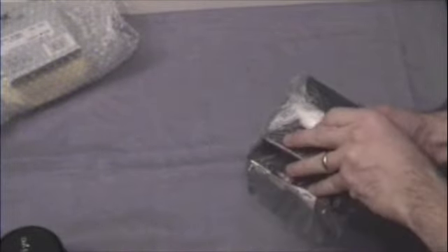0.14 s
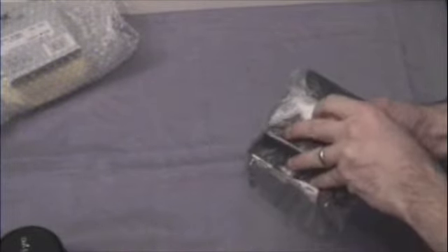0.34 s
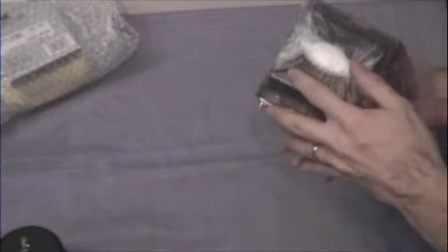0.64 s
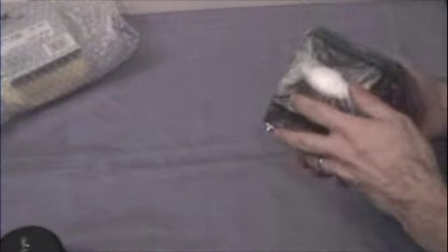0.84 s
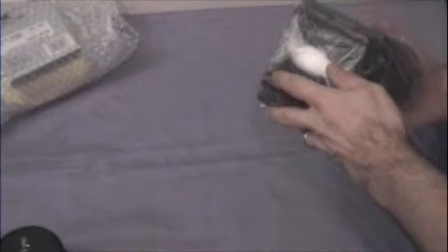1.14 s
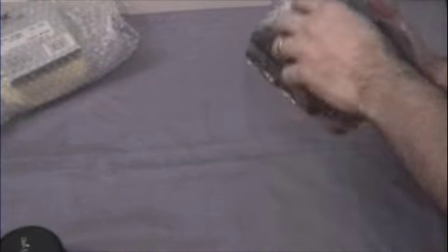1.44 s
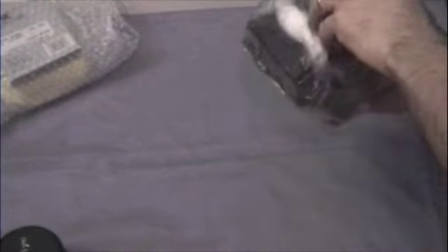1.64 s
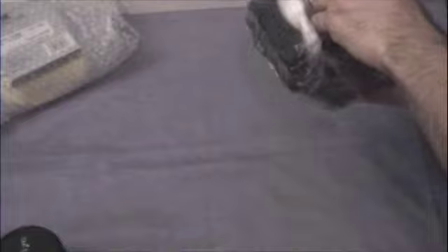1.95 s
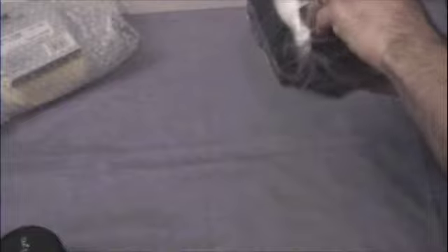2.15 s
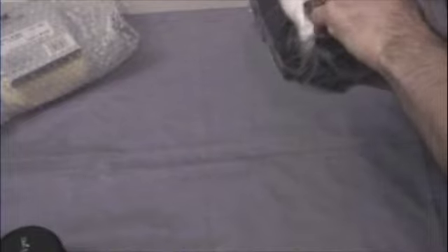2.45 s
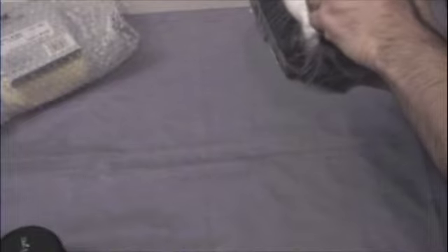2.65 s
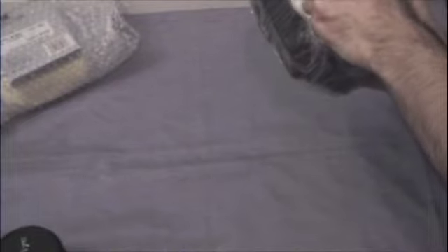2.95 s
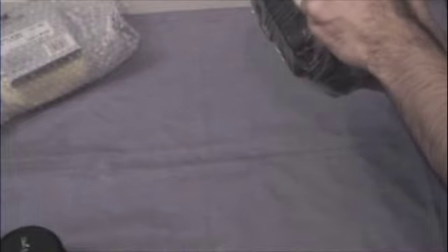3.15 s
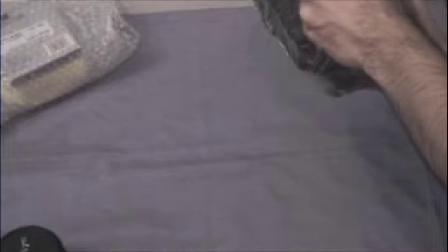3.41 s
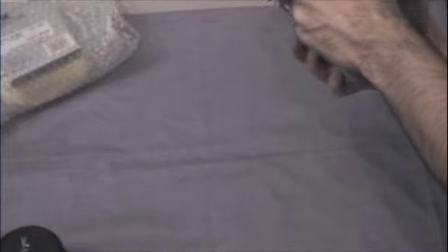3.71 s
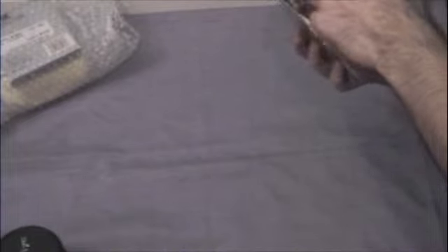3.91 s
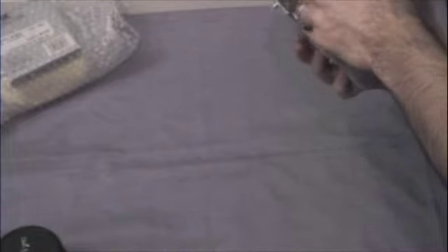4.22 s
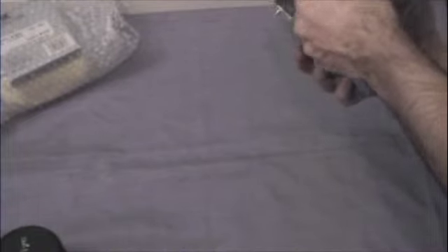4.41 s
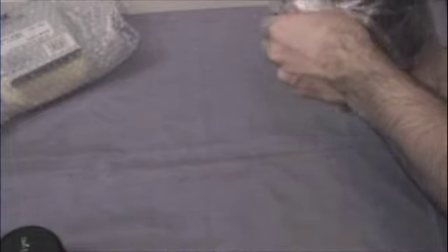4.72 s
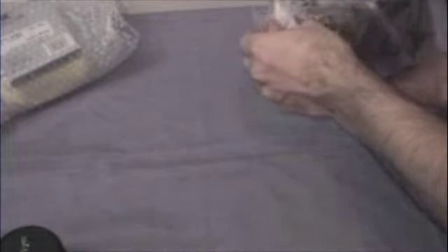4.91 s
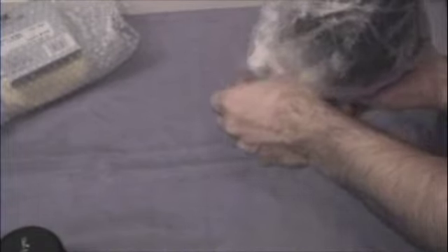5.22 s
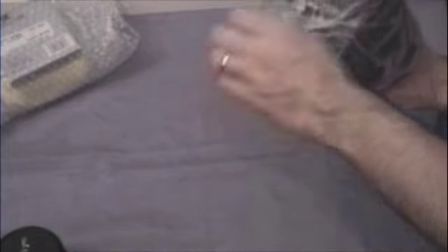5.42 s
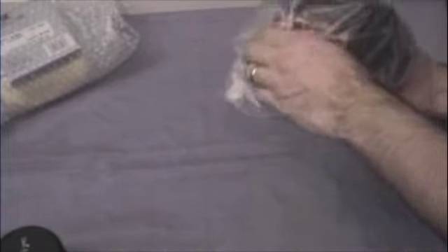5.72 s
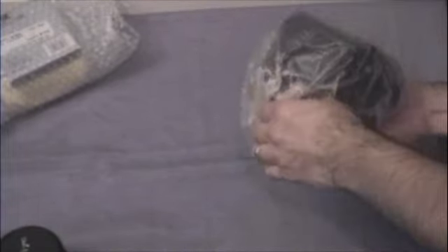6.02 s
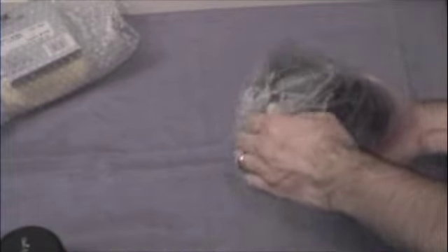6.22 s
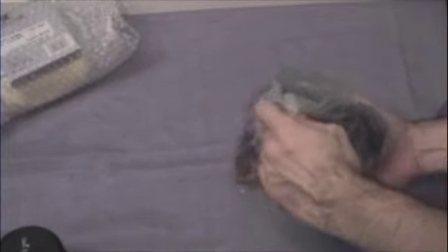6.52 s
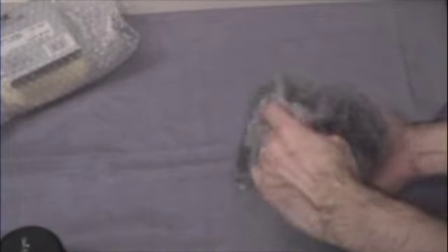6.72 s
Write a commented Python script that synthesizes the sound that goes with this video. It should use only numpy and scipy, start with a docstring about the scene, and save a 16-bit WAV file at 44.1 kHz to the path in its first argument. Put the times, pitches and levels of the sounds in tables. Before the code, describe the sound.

Thin, crisp plastic film is worked by hand around a small hollow box, close to a camera microphone in a small room with very short tails. From 0 to 1.5 seconds, uneven crackles and clicks come in quick clumps, with a sharper snap near 0.8 and hollow box knocks, notably around 1.3. From about 1.6 to 3.3 the handling is light: sparse, quiet ticks and small taps, with one brighter click at 2.8. At 3.4 a very sharp, loud snap bursts out, the strongest single sound. Scattered snaps and short bursts follow, building from 4.5 into dense, loud crumpling until 5.3. It nearly stops from 5.4 to 5.7, then swells again into thick, forceful crackle from 6 to the end. Underneath run steady soft hiss, low fan hum, a faint wavering motor tone and an extremely faint high whistle.

```python
"""Thin plastic film crackles at once, in dense clumps, as hands turn and pull open a bag wrapped round a small box.
Each small fold is a click that rings a patch of film; large folds snap loudly and knock the hollow box.
Pressing fingers make the box louder for a moment, and a small room adds short tails.
Behind it a fan hums (noise through narrow resonances) and a low motor tone wavers.
The tape camera adds hiss (shaped noise) and a faint line whistle (steady sines)."""
import sys
import numpy as np
from scipy import signal
from scipy.fft import rfft, irfft
from scipy.io import wavfile

SR = 44100
rng = np.random.default_rng(int(sys.argv[2]) if len(sys.argv) > 2 else 0)


def wav_record(signal):
    """Record a signal, one row per channel, as 16-bit PCM in the file named by sys.argv[1]."""
    frames = np.transpose(np.atleast_2d(signal))
    bounded = np.clip(frames, -1, 1)
    # unit amplitude maps onto the largest positive 16-bit level
    quanta = np.round(bounded * 32767).astype(np.int16)
    wavfile.write(sys.argv[1], SR, quanta)


def natural_amplitude(level_db):
    """Convert a level in decibels to a linear amplitude factor, elementwise."""
    exponent = np.asarray(level_db, float) / 20
    return 10 ** exponent


N = 302526   # length in samples

# How hard the film is worked: time_s, relative_crackle_db
FILM_EFFORT = [(0.0, -36), (0.19, -44), (0.27, -41), (0.42, -56), (0.53, -43), (0.56, -35), (0.69, -38.5),
               (0.76, -41), (0.9, -38), (1.01, -38.5), (1.2, -35.5), (1.49, -45.5), (1.62, -53.5),
               (1.76, -47.5), (1.83, -61), (1.88, -42.5), (2.01, -59.5), (2.39, -54.5), (2.5, -60.5),
               (2.8, -46.5), (3.0, -50), (3.08, -59), (3.17, -52), (3.36, -54.5), (3.5, -48), (3.76, -36.5),
               (3.92, -57.5), (4.12, -64), (4.17, -35.5), (4.55, -36), (4.59, -30.5), (4.7, -40),
               (4.77, -35), (4.81, -27), (5.1, -29.5), (5.2, -25), (5.29, -39), (5.32, -28.5), (5.42, -55),
               (5.69, -62), (5.699, -47), (5.72, -42), (5.75, -41), (6.0, -30.5), (6.17, -37), (6.31, -32),
               (6.6, -28), (6.86, -32)]
# Large folds that let go: main_click_s, relative_peak_db, relative_box_knock_db, ring_hz
LARGE_FOLDS = [(0.028, -30, -22, 3500), (0.045, -29.5, -12, 3600), (0.1426, -28, -32, 6630.0),
               (0.2081, -27, -31, 3570.0), (0.2297, -25.5, -26.0, 5250.0), (0.2464, -23, -18, 3640),
               (0.2508, -24.5, -15, 3400), (0.2877, -23, -32, 3570.0), (0.3385, -28, -18, 3660.0),
               (0.3603, -31, -19.0, 3530.0), (0.3776, -23, -30.0, 6800.0), (0.4341, -28.5, -25.0, 3230.0),
               (0.4455, -31, -22.0, 3400.0), (0.488, -36, -25.0, 6500.0), (0.5475, -18.5, -17.5, 3880.0),
               (0.5874, -23.5, -15, 5040.0), (0.6527, -21.5, -26, 6630.0), (0.6773, -18, -17, 7060.0),
               (0.6914, -22, -25, 3660.0), (0.736, -23.5, -30, 3190.0), (0.7517, -26.0, -22.0, 7020.0),
               (0.7832, -11, -23, 3600), (0.7885, -14.5, -20.5, 3000), (0.799, -20, -23, 3600),
               (0.8915, -23.0, -20.0, 5860.0), (0.903, -24, -27.0, 3830.0), (1.0619, -25.0, -24, 3450.0),
               (1.1352, -27.5, -25, 6720.0), (1.1637, -23.5, -28, 3790.0), (1.1845, -27, -28.0, 3920.0),
               (1.2084, -24, -37, 6980.0), (1.271, -26, -24.0, 3010.0), (1.3087, -32, -8, 3400),
               (1.3125, -30, -8, 3300), (1.3656, -27, -20, 3400.0), (1.4, -31.5, -15.0, 3320.0),
               (1.5203, -28.5, -30.0, 6500.0), (1.625, -39, -18, 3750.0), (1.6618, -39, -22.0, 7190.0),
               (1.747, -33, -34, 6980.0), (1.7754, -29.5, -27.0, 3450.0), (1.853, -32, -28, 6800),
               (1.8611, -25.5, -34.0, 6700), (1.9322, -34.5, -19.0, 3660.0), (1.981, -35, -11.5, 6900),
               (2.0285, -31.5, -29, 5100), (2.071, -33.5, -24.0, 3620.0), (2.1473, -33, -16, 7150.0),
               (2.1587, -30, -24.0, 6120.0), (2.1847, -31, -25.0, 7360.0), (2.213, -29, -21, 7150.0),
               (2.2797, -32, -29.0, 6720.0), (2.326, -30.5, -15, 3640), (2.3915, -34.5, -28, 3530.0),
               (2.426, -40, -27, 3450.0), (2.5705, -33, -26, 3200), (2.5776, -30.5, -29.0, 3340),
               (2.6063, -35, -17, 3490.0), (2.6774, -29, -23.0, 6720.0), (2.7068, -31, -24, 6500),
               (2.7129, -27, -17.5, 3490.0), (2.7614, -34.5, -11.5, 3450.0), (2.794, -39, -28, 3600),
               (2.811, -27, -30, 6500), (2.8176, -16.5, -38, 6400), (2.8226, -23, -32, 6300),
               (2.8804, -33.0, -25.0, 3270.0), (2.9342, -26, -28, 6900), (2.9737, -31, -27, 3320.0),
               (2.989, -30, -28, 6590.0), (3.0084, -37, -28.0, 3360.0), (3.0328, -32, -32, 3140.0),
               (3.079, -42, -28.0, 6680.0), (3.138, -32, -20, 6720.0), (3.1477, -27.5, -30, 7060.0),
               (3.2043, -31.5, -15, 7020.0), (3.2729, -30, -35, 3250), (3.3184, -41, -24.0, 2930.0),
               (3.3822, -28, -17, 6120.0), (3.3949, -5.5, -40, 3300), (3.3965, -9, -34, 6800),
               (3.3995, -6, -33.0, 3420), (3.4027, -4.5, -30, 3320.0), (3.406, -9.5, -35, 3520),
               (3.4099, -15, -24, 3320.0), (3.4131, -20, -14, 3470), (3.427, -21, -21, 3530.0),
               (3.4882, -31, -29, 3400.0), (3.5192, -29, -27.0, 5600.0), (3.6148, -26.5, -33, 3530.0),
               (3.669, -22, -25.0, 3320.0), (3.7163, -18.5, -31.0, 6160), (3.7413, -20.5, -23, 4950.0),
               (3.7829, -13.5, -26.0, 2930.0), (4.0656, -39.0, -18, 6240.0), (4.1537, -28, -15, 2630.0),
               (4.2056, -29, -23.0, 3190.0), (4.259, -30, -27.0, 3570.0), (4.35, -20, -24, 3400.0),
               (4.3671, -16.5, -31.0, 5210.0), (4.4257, -16, -31, 3570.0), (4.4961, -26, -26.0, 2970.0),
               (4.5707, -19, -24, 3530.0), (4.5914, -16.5, -35, 3270.0), (4.7886, -18, -22, 3190.0),
               (4.8027, -21, -31, 3060.0), (4.887, -20, -23, 5500), (4.9981, -19.0, -21, 3750.0),
               (5.0574, -16, -21, 3140.0), (5.1312, -16.5, -33, 3620.0), (5.206, -22, -25.0, 6500.0),
               (5.2524, -25, -28, 3360.0), (5.3021, -14.5, -27, 3190.0), (5.3155, -19.5, -26, 3450.0),
               (5.341, -25, -24, 3450.0), (5.3907, -36, -26.0, 3270.0), (5.455, -37.0, -29, 7320.0),
               (5.577, -34, -26, 3100.0), (5.606, -38, -27, 3530.0), (5.6474, -39.5, -23.0, 5990.0),
               (5.6622, -39.5, -24.0, 3620.0), (5.6729, -39.5, -22.0, 7580.0), (5.698, -37, -24, 5500),
               (5.7038, -35, -27.0, 2670.0), (5.7441, -25.5, -27.0, 3140.0), (5.785, -34, -27.0, 7060.0),
               (5.832, -26.5, -19, 6850.0), (5.8504, -26.0, -29.0, 3270.0), (5.9953, -24, -31, 7970.0),
               (6.0893, -18, -36, 4950.0), (6.199, -21, -25.0, 3490.0), (6.2434, -25.5, -25.0, 3530.0),
               (6.347, -17, -19, 2540.0), (6.4218, -17, -30, 2970.0), (6.4778, -19, -27.0, 3190.0),
               (6.546, -14.5, -28.0, 2800.0), (6.6034, -14.5, -24, 3360.0), (6.6766, -21, -26.0, 3660.0),
               (6.7219, -15, -20.5, 2970.0), (6.7864, -15.5, -26.0, 6370.0), (6.822, -19, -24.0, 3490.0),
               (6.8548, -18, -21, 6330)]
# Ringing modes of the hollow box: pitch_hz, width_hz, relative_level_db
BOX_MODES = [(631, 78, -4.5), (704.6, 87, 2), (793, 130, -8), (1000, 95, -3), (1188, 108, -5.5),
             (1259, 104, 0.5), (1530, 140, -12.5)]
# Peaks and dips of the microphone: pitch_hz, width_hz, gain_db
MICROPHONE_PEAKS = [(2420, 1260, 3), (3505, 1000, 10), (4220, 750, -5.5), (6800, 2110, 8.5),
                    (9070, 1300, -3), (10500, 2270, 4)]
# Colour of room air and tape hiss: pitch_hz, relative_level_db
AIR_COLOUR = [(15, -51), (25, -9), (113, -14.5), (184, -13.5), (247, -4), (459, -22), (554, -12),
              (688, -16.5), (1240, -18.5), (1420, -20.5), (1970, -20), (9140, -30.5), (10200, -31.5),
              (12600, -31.5), (15700, -40)]
# How alike the hiss is in left and right: pitch_hz, likeness (1 same, -1 opposite)
AIR_ALIKE = [(60, -0.75), (180, 0.71), (550, -0.26), (1650, 0.49), (4970, 0.043), (15000, -0.2)]
# Fan tones: pitch_hz, width_hz, level_db, left-right likeness
FAN_TONES = [(125, 3.3, -66.5, 0.2), (156.5, 8.9, -67.5, 0.17), (208, 12, -69, 0.23),
             (256.4, 11.2, -59.5, 1), (338, 15.6, -66.5, 0.23), (581, 15, -69, 0.19), (3680, 370, -61.5, 1)]
# Steady whistles: pitch_hz, relative_level_db
WHISTLE_TONES = [(15434, -90), (15734, -82)]
# Two microphone ports a few cm apart: pitch_hz, left-right likeness (later limited to -1..1)
PORT_ALIKE = [(100, 4), (300, 0.8), (700, 0.98), (1400, 3.5), (2500, 2), (4500, 1.2), (7200, 0.86),
              (8200, 0.55), (9000, -0.2), (9600, -0.83), (10000, -1.06), (10500, -3), (11000, -0.85),
              (11400, -1), (12000, -0.1), (12800, 1.9), (13600, 0.33), (15000, -4)]
# Hold on the parcel: time_s, favoured_box_pitch_hz, box_relative_to_film_db, brightness_db_per_octave
HAND_GRIP = [(0, 900, -11.5, 2.5), (0.45, 930, -9.5, 3), (0.9, 950, -10.5, 1), (1.3, 1200, -11.5, 0.5),
             (1.7, 1000, -9.5, -1), (2.3, 834, -11.5, 3), (2.9, 820, -11, -2), (3.4, 1140, -18, 3),
             (3.8, 1140, -10, -0.5), (4.3, 1170, -15, -2.5), (5.0, 1180, -16, -2), (5.7, 1140, -13.5, 0),
             (6.3, 1240, -12.5, -1.5), (6.86, 1070, -14.5, -0.5)]
# Fingers press the box: start_s, relative_box_db, favoured_pitch_hz
FINGER_PRESSES = [(0.038, -42, 700), (0.11, -55, 1200), (0.245, -43.5, 700), (0.32, -52, 1200),
                  (0.37, -46.5, 1200), (0.543, -41, 800), (0.675, -43, 690), (0.78, -31.5, 700),
                  (0.885, -39, 700), (1.303, -33.5, 1180), (2.32, -48, 876), (2.78, -62, 690),
                  (3.4, -37, 1250), (3.78, -41.5, 1200), (4.15, -38, 1350), (4.235, -38.5, 1210),
                  (4.38, -42.5, 930), (4.86, -32.5, 1070), (5.13, -39.5, 1100), (5.299, -39, 1300),
                  (6.588, -30.5, 1290), (6.846, -33, 1130)]

AIR_DB = -54
HUM_WAVER_DB, HUM_WAVERS_PER_S = 1, 7.6
MOTOR_HZ, MOTOR_DB, MOTOR_WAVER_HZ = 53, -64, 2.84
TAPE_CUT_HZ = 11230
ROOM_T60_S, ROOM_TREBLE_T60_S = 0.27, 0.19   # time for a tail to fall 60 dB
ROOM_DB, SPOTS_PER_S = -5, 35   # tail level before the scatter; spots on the bag taken each second
PRESS_S = 0.007   # rise time
DULLS_PER_DB, BRIGHT_WAVER_DB = 0.06, 0.5   # dB per octave: harder handling works larger patches
FLURRY_DB, FLURRY_T60_S = -25, 0.16   # small folds that follow a snap and die away
GIVE_S, CREASE_S = 0.0015, 0.006   # clicks spread this far before and after the main click of a snap
LESSER_DB, EARLY_DB = -9, -5.5   # strongest lesser click against the main one; extra drop if early
SNAP_TOP_HZ, SNAP_CYCLES, CRACK_DB = 9500, 2.77, 2.5   # top of the dry crack, patch ring, crack gain
FOLDS_PER_S, SIZE_SPREAD_DB = 2400, 3.5   # base rate before clumping; spread of fold sizes


def rms_one(x):
    """Scale to unit power."""
    return x / np.sqrt(np.mean(x ** 2) + 1e-20)


def at_hz(points, hz):
    """Read a table at the given pitches, on a log-frequency axis."""
    table_hz, values = np.array(points).T
    return np.interp(np.log(hz), np.log(table_hz), values)


def drift(rate):
    """Slow random wander of typical size 1; a higher rate (Hz) wanders faster."""
    r = np.exp(-40 * np.pi * rate / SR)
    noise = rng.standard_normal(N // 20 + 2002)   # one value per 20 samples
    slow = signal.lfilter([1], [1, -2 * r, r * r], noise)[2000:]
    return np.interp(np.arange(N) / 20, np.arange(len(slow)), rms_one(slow))


def resonance(x, hz, width_hz):
    """Two-pole band-pass that rings near one pitch, with gain 1 on top."""
    r = np.exp(-np.pi * width_hz / SR)
    ring = [1, -2 * r * np.cos(2 * np.pi * hz / SR), r * r]
    return signal.lfilter([(1 - r * r) / 2, 0, (r * r - 1) / 2], ring, x + 1e-18)


def cut(x, hz, kind, order=2):
    """Butterworth filter: "low" keeps the lows, "high" keeps the highs."""
    return signal.sosfilt(signal.butter(order, min(hz, .45 * SR), kind, fs=SR, output="sos"), x)


def stereo(shared, opposite, likeness):
    """Blend a shared and an opposite part so left and right are alike to the given degree."""
    alike = np.clip(likeness, -1, 1)
    return np.sqrt((1 + alike) / 2) * shared + np.sqrt((1 - alike) / 2) * opposite * [[1], [-1]]


def swell(rises):
    """Quick rise to 1, slower fall; time counted in rise times."""
    rises = np.clip(rises, 0, 50)
    return rises * np.exp(1 - rises)


def whistles():
    """Faint steady sine tones, very high in pitch."""
    t = np.arange(N) / SR
    return sum(natural_amplitude(db + 5) * np.sin(2 * np.pi * hz * t) for hz, db in WHISTLE_TONES)


def air():
    """Steady broad noise, alike in the two channels by band."""
    hz = np.maximum(np.fft.rfftfreq(N, 1 / SR), 1)
    mid, side = rfft(rng.standard_normal((2, N)))
    both = natural_amplitude(at_hz(AIR_COLOUR, hz)) * stereo(mid, side, at_hz(AIR_ALIKE, hz))
    return natural_amplitude(AIR_DB) * rms_one(irfft(both, N)) * natural_amplitude([[.5], [-.5]])   # left slightly louder


def motor():
    """A low tone whose pitch and strength waver."""
    turns = np.cumsum(MOTOR_HZ + MOTOR_WAVER_HZ * drift(3.8)) / SR
    tone = np.sin(2 * np.pi * turns + np.array([[0], [1.3]]))   # right is shifted in phase
    return natural_amplitude(MOTOR_DB + 1.3 * drift(5.0)) * tone * natural_amplitude([[1.2], [-1.2]])


def fan():
    """Low tones and one broad high one: noise twice through resonances, each swelling and sinking alone."""
    tones = np.zeros((2, N))
    for hz, width, db, alike in FAN_TONES:
        noise = stereo(*rng.standard_normal((2, N)), alike)
        tone = resonance(resonance(noise, hz, width), hz, width)
        tones += natural_amplitude(db + HUM_WAVER_DB * drift(HUM_WAVERS_PER_S)) * rms_one(tone)
    return tones * natural_amplitude([[1.2], [-1.2]])


def camera(x):
    """Microphone peaks; port spacing sets how alike the channels are by pitch; the left has more bass."""
    for hz, width, db in MICROPHONE_PEAKS:
        x = x + (natural_amplitude(db) - 1) * resonance(x, hz, width)
    shared, opposite = rfft(cut(x, TAPE_CUT_HZ, "low", order=4))
    hz = np.maximum(np.fft.rfftfreq(N, 1 / SR), 1)
    left, right = irfft(stereo(shared, opposite, at_hz(PORT_ALIKE, hz)), N)
    return np.array([left + 0.4 * cut(left, 820, "low", order=1), right])


def room(x, count=10):
    """Folds sound from different spots on the bag, taken in turn with smooth fades, each with its own tail."""
    t = np.arange(SR // 3) / SR
    # each spot has a shared and an opposite part
    white = rng.standard_normal((count, 2, len(t))) * np.clip(t / 0.0033, 0, 1)
    low = cut(white, 4300, "low", order=1)
    tail = low * natural_amplitude(-60 * t / ROOM_T60_S) + (white - low) * natural_amplitude(-60 * t / ROOM_TREBLE_T60_S)
    tail = tail / np.sqrt(np.sum(tail ** 2, axis=2, keepdims=True)) * natural_amplitude(ROOM_DB)
    # scatter off hands and table
    tail += natural_amplitude(-25.5) * rng.standard_normal(tail.shape) * natural_amplitude(-60 * t / 0.033)
    tail[:, :, 0] += [.8, -.4]   # direct sound
    turn = (np.arange(N) / SR * SPOTS_PER_S - np.arange(count)[:, None]) % count
    share = np.cos(np.pi / 2 * np.clip(turn - 1, -1, 1)) ** 2
    return signal.fftconvolve((share * x)[:, None], tail, axes=2).sum(axis=0)[:, :N]


def handling():
    """Film dB, box dB, brightness dB per octave and favoured box Hz over time; snaps and presses add bursts."""
    t = np.arange(N) / SR
    worked_db = np.interp(t, *np.transpose(FILM_EFFORT))
    grip_s, grip_hz, under_db, taut_db = np.transpose(HAND_GRIP)

    # the main click of each snap sets off a flurry of small folds that dies away
    bursts = np.zeros(N + 1)
    for main_click_s, peak_db, _, _ in LARGE_FOLDS:
        bursts[min(round(main_click_s * SR), N)] += natural_amplitude(peak_db + FLURRY_DB) ** 2
    fall = natural_amplitude(-60 / (FLURRY_T60_S * SR)) ** 2
    flurry = signal.lfilter([1], [1, -fall], bursts[:N] + 1e-18)
    film_db = 10 * np.log10(natural_amplitude(worked_db) ** 2 + flurry)

    # the box follows the steady hold plus the presses; the stronger one weighs more in the pitch
    held = natural_amplitude(worked_db + np.interp(t, grip_s, under_db)) ** 2
    presses = np.array([(natural_amplitude(db) * swell((t - at) / PRESS_S)) ** 2 for at, db, _ in FINGER_PRESSES])
    box_power = held + presses.sum(axis=0)
    press_hz = np.array(FINGER_PRESSES)[:, 2]
    favoured_hz = (held * np.interp(t, grip_s, grip_hz) + press_hz @ presses) / box_power

    brightness_db = np.interp(t, grip_s, taut_db) - DULLS_PER_DB * (film_db - film_db.mean())
    return film_db, 10 * np.log10(box_power), brightness_db, favoured_hz


def box(clicks, grip_hz):
    """The hollow box under the film rings at its low modes, most at those near the pitch the grip favours."""
    out = 0.23 * resonance(clicks, 700, 1390) + 0.051 * resonance(clicks, 210, 360)
    for k, (hz, width, db) in enumerate(BOX_MODES):
        octaves_away = np.abs(np.log2(hz / grip_hz))
        out += (-1) ** k * resonance(clicks * natural_amplitude(db - 5.8 * octaves_away), hz, width)
    return out


def snaps(grip_hz):
    """A large fold lets go: a main click amid quick lesser ones along the crease, ringing a patch of film."""
    lead = 400   # spare samples for clicks ahead of the main one
    out, knocks = np.zeros((2, N + 5000))
    draws = rng.random((len(LARGE_FOLDS), 40))
    for (main_click_s, peak_db, knock_db, hz), draw in zip(LARGE_FOLDS, draws):
        when = np.r_[0, (GIVE_S + CREASE_S) * draw[:9] - GIVE_S]
        at = np.clip(lead + when * SR, 0, 3000).astype(int)
        click_db = peak_db + np.r_[0, LESSER_DB - 9 * draw[10:19]] + EARLY_DB * (when < 0)
        sizes = natural_amplitude(click_db) * np.sign(draw[20:30] - .5)
        # every second click rings at another pitch
        own, other = np.zeros((2, 4000))
        np.add.at(own, at[::2], sizes[::2])
        np.add.at(other, at[1::2], sizes[1::2])
        other_hz = np.clip(hz * 2 ** (1.32 * (draw[30] - .5)), 1500, 9000)
        rings = resonance(own, hz, hz / SNAP_CYCLES)
        rings += resonance(other, other_hz, other_hz / SNAP_CYCLES)
        crack = cut(cut(own + other, SNAP_TOP_HZ, "low", order=1), 1500, "high", order=1)
        i = round(main_click_s * SR)
        out[i:i + 4000] += natural_amplitude(4.5) * rings + natural_amplitude(CRACK_DB) * crack
        knocks[i:i + 4000] += natural_amplitude(knock_db) * np.abs(own + other)
    return out[lead:N + lead] + natural_amplitude(39) * box(knocks[lead:N + lead], grip_hz)


def film(clicks, brightness_db, cycles=0.99):
    """Each fold briefly rings a patch of its own size; taut film favours the small, high patches."""
    pitches, dealt = np.geomspace(1500, 14000, 14), rng.integers(0, 14, N)
    out = 0.51 * cut(clicks, 800, "high", order=1)
    for k, hz in enumerate(pitches):
        own = clicks * (dealt == k) * natural_amplitude(brightness_db * np.log2(hz / 4500))
        out += resonance(own, hz, hz / cycles)
    return out


def crackle(film_db, box_db, brightness_db, grip_hz):
    """Folds come at random in clumps, sparser under light handling; a few are much larger than the rest."""
    busy_db = .5 * np.clip(film_db + 38, -20, 10)
    # hard handling evens the clumps
    clumps_db = (2.2 * drift(30) + 3.0 * drift(200)) * natural_amplitude(-0.8 * busy_db)
    sizes_db = SIZE_SPREAD_DB * np.minimum(rng.exponential(1, N), 4) - busy_db / 2
    sizes = natural_amplitude(sizes_db) * rng.choice([-1, 1], N)
    clicks = sizes * (rng.random(N) < FOLDS_PER_S * natural_amplitude(clumps_db + busy_db) / SR)
    folds = film(clicks, brightness_db + BRIGHT_WAVER_DB * drift(8.3))
    knocks = box(clicks * natural_amplitude(1.1 * drift(40)), grip_hz)
    return natural_amplitude(film_db - 7.0) * rms_one(folds) + natural_amplitude(box_db - 3.0) * rms_one(knocks)


def scene():
    """The bag in the room, as shared and opposite parts for the two ports."""
    film_db, box_db, brightness_db, grip_hz = handling()
    return room(crackle(film_db, box_db, brightness_db, grip_hz) + snaps(grip_hz))


def low_pass(x):
    """Removes everything above the highest recorded frequency."""
    return signal.sosfilt(signal.butter(12, 15820, fs=SR, output="sos"), x)


def record(dry):
    """The camera colours the bag; fan, motor, hiss and whistles join on the tape."""
    bag = 0.78 * np.tanh(camera(dry) / 0.73)   # the tape rounds the loudest peaks
    bag = cut(bag, 15700, "low", order=8)
    mix = bag + fan() + motor() + air() + whistles()
    return low_pass(mix)


dry = scene()
out = record(dry)
wav_record(out)
```